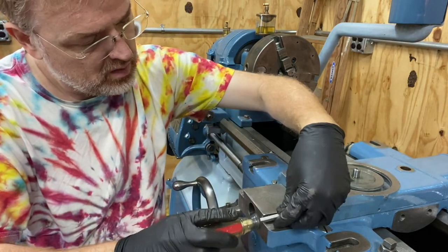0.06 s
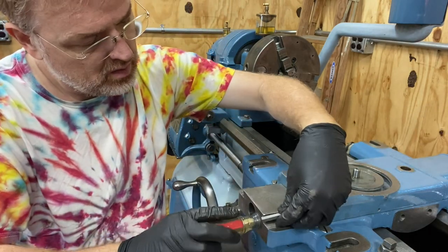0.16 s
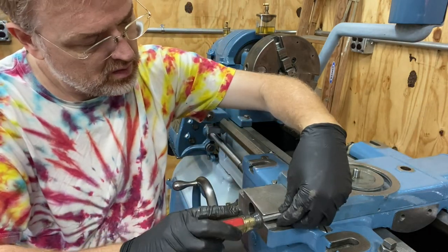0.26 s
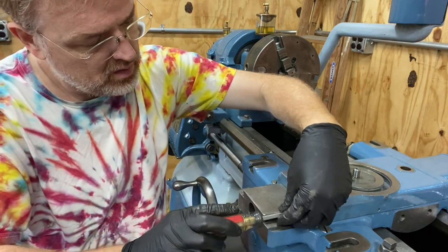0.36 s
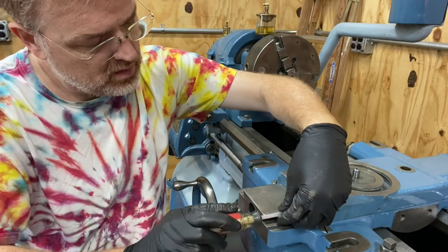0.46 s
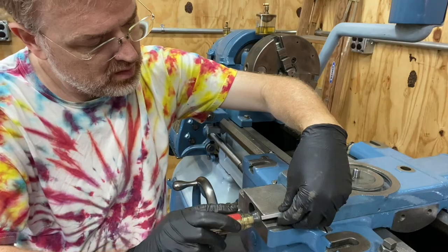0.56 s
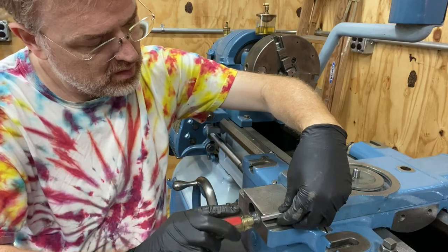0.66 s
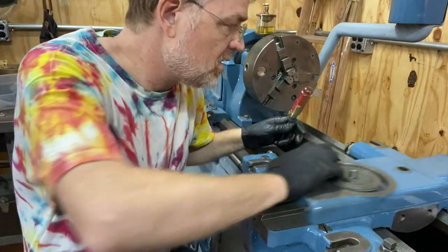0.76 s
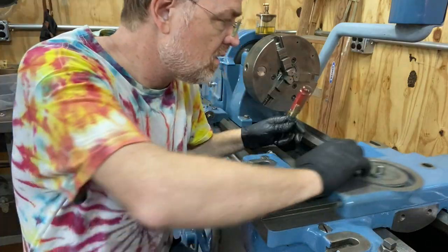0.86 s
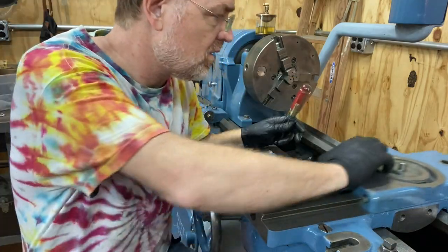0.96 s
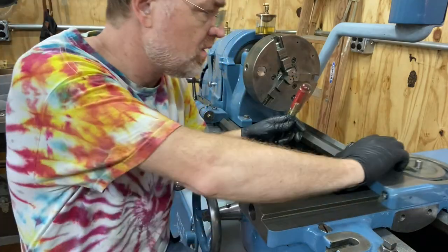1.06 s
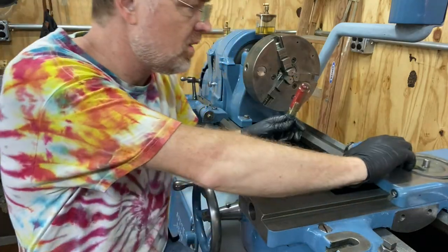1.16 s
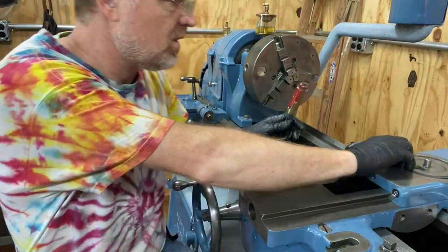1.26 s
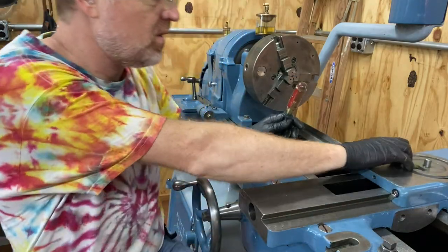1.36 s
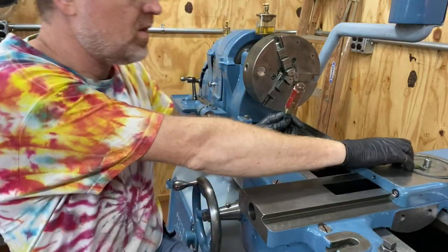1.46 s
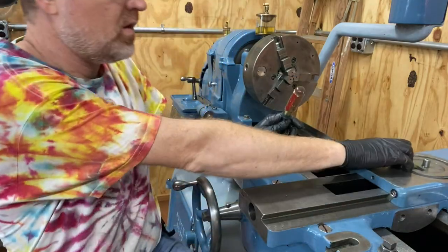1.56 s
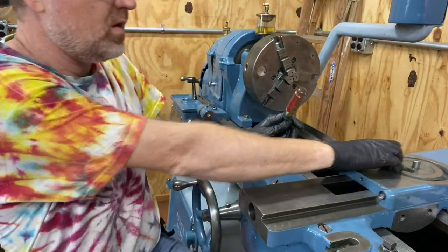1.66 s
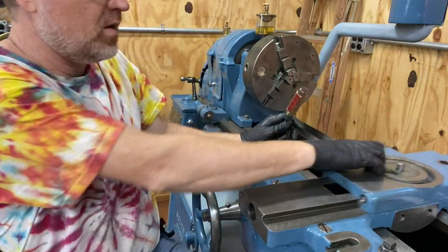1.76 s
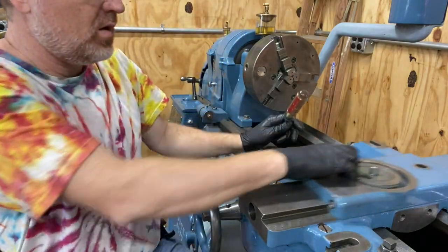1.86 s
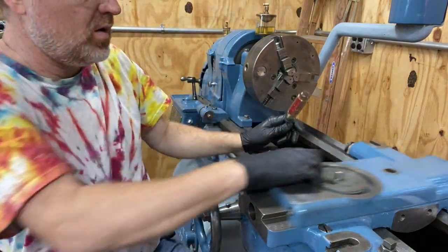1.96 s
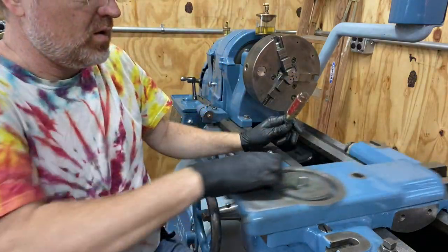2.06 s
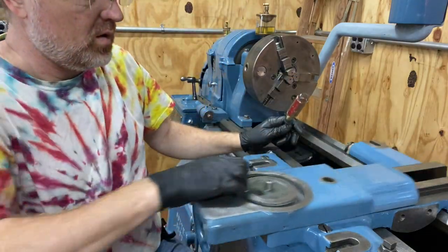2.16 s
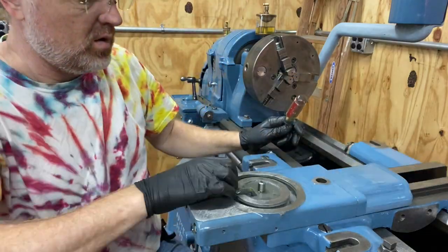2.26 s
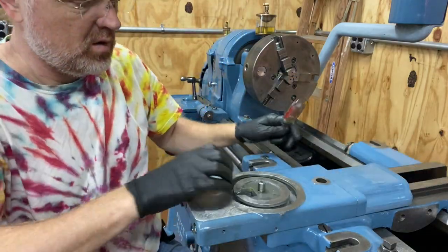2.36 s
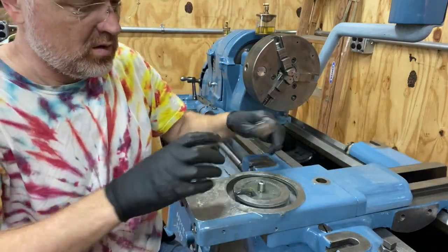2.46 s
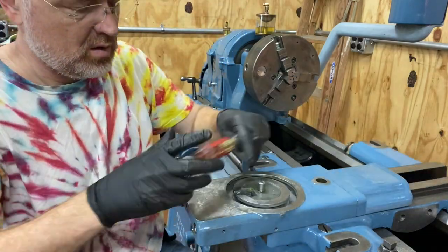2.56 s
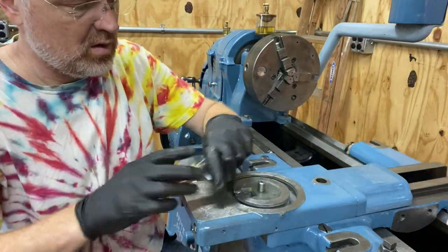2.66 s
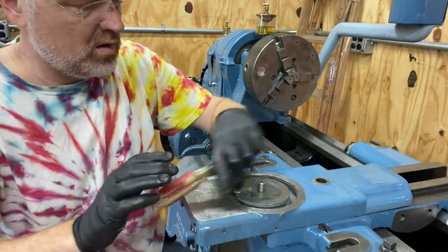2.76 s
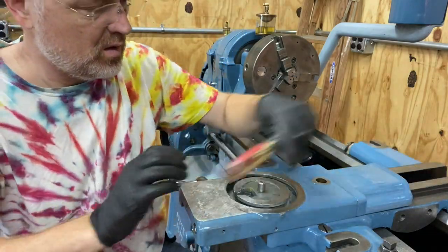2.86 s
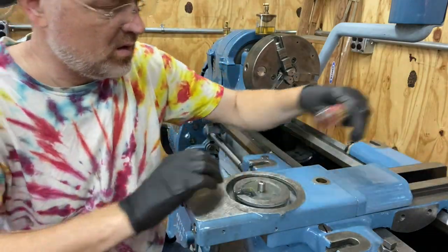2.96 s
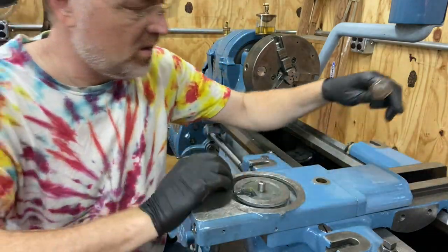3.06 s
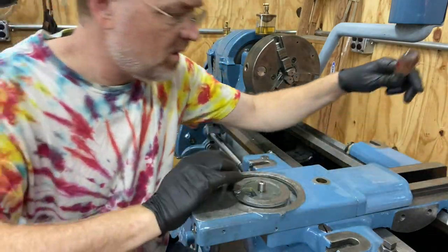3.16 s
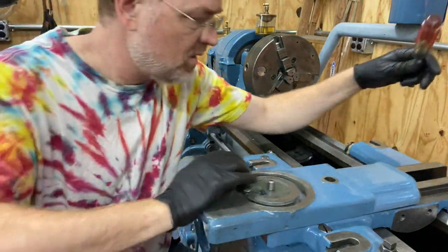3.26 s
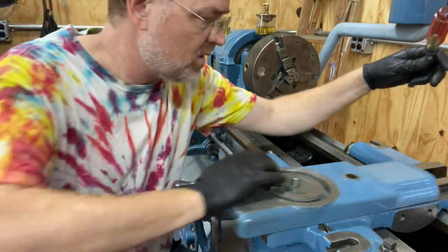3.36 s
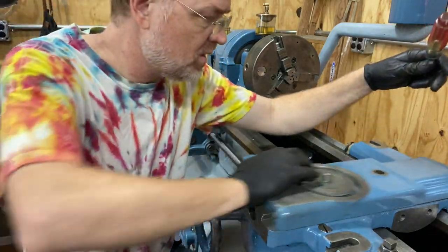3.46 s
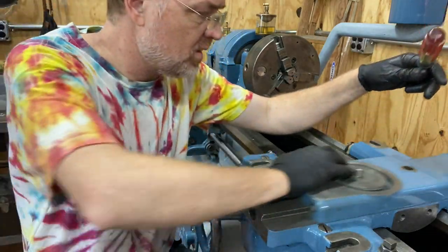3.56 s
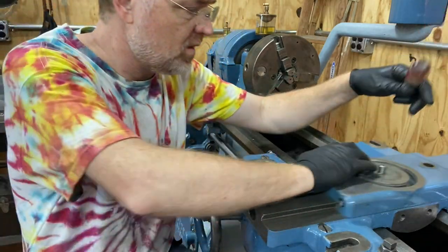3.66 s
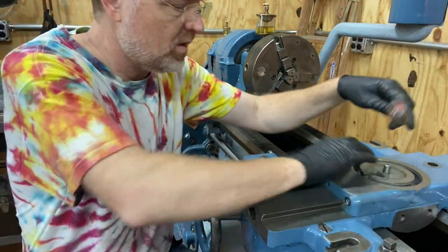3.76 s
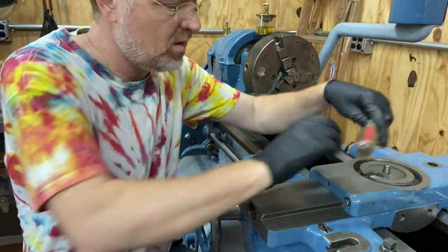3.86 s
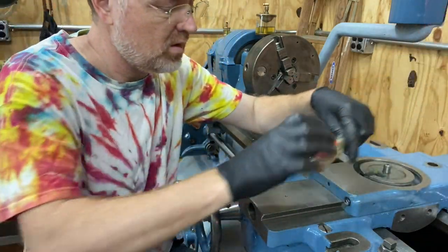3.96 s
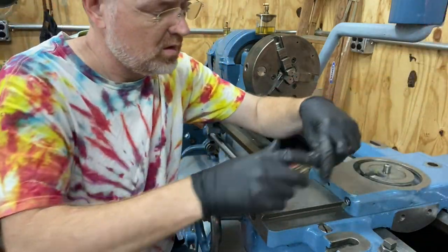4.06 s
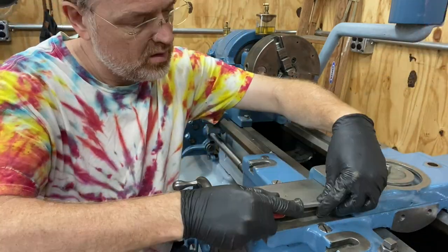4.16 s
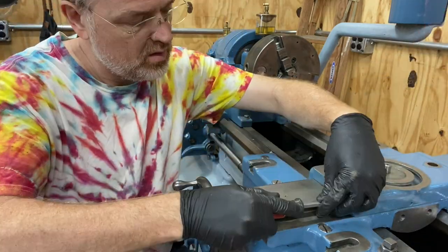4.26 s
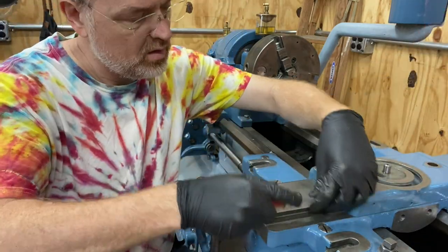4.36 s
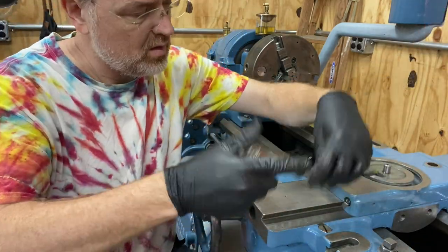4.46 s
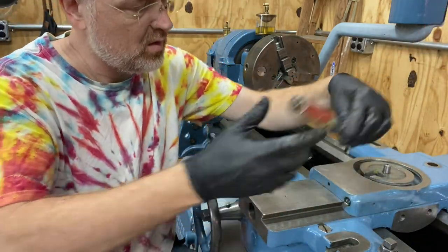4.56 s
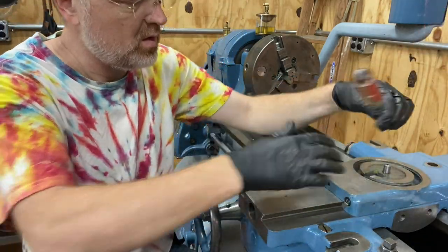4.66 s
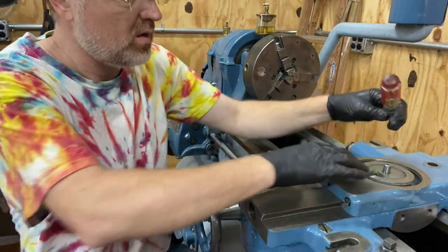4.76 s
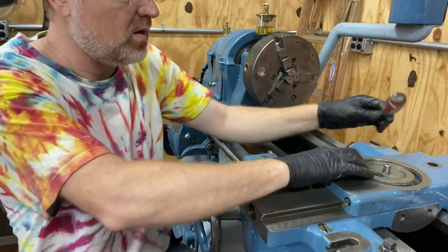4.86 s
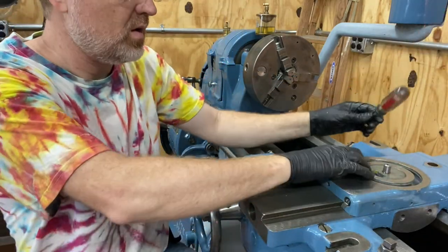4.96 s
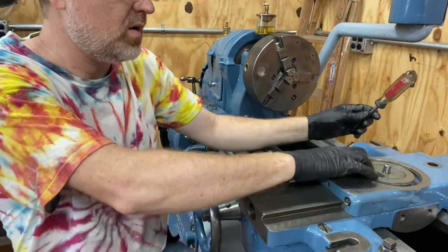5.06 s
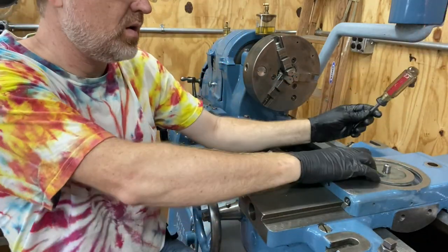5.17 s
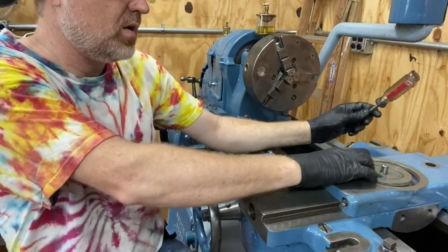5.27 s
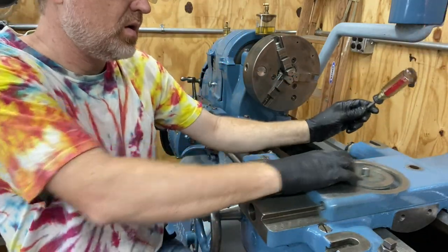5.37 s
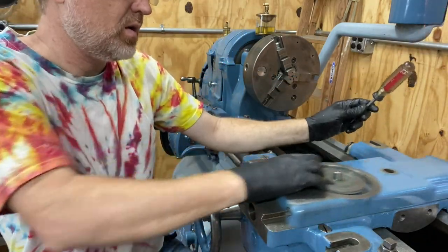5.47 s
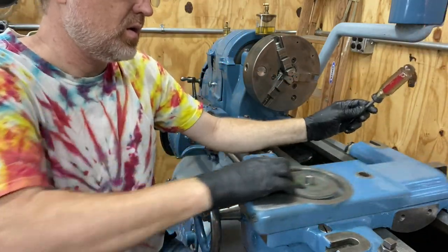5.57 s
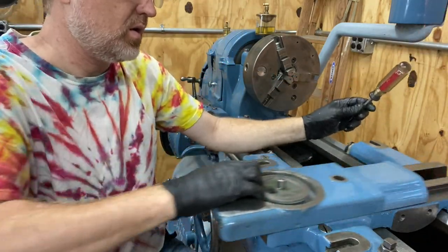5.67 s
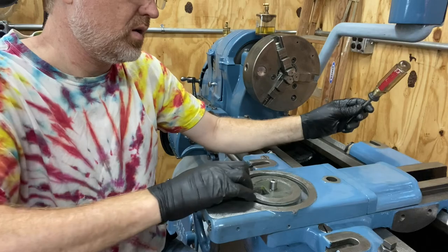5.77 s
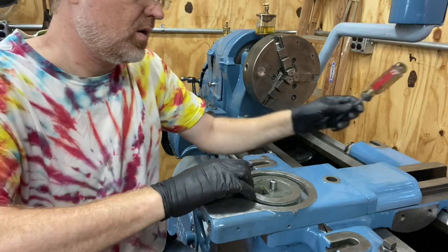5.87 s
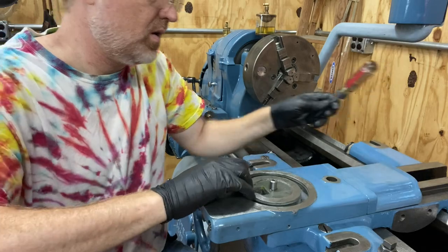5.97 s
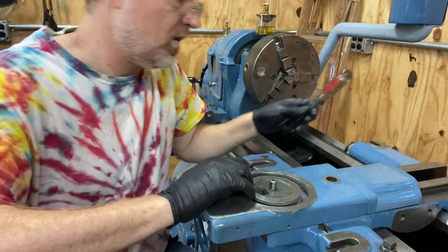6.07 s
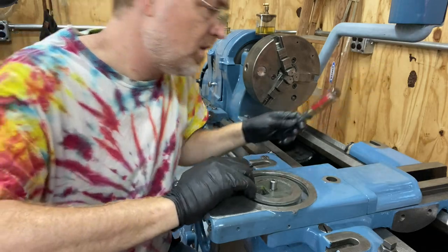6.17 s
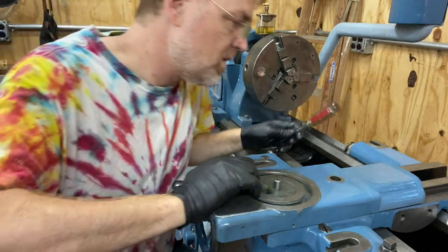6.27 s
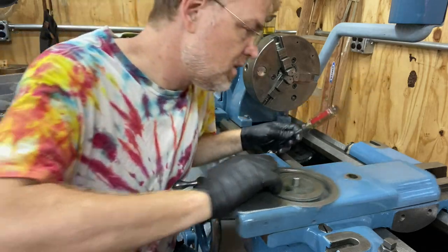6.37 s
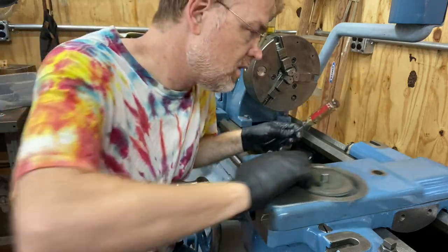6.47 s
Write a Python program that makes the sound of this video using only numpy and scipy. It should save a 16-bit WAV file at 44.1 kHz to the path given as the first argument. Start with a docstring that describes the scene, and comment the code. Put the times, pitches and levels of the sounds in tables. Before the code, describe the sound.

In a small wooden workshop, light screwdriver taps come first, then a heavy iron slide scrapes along its ways and stops with a sharp metallic clack. It grinds back, a hollow cover is knocked, and another scrape follows. Rattly knocks and ticks lead to the loudest, heavy clunk, then two more gritty strokes. Close stereo microphone, short room echo, faint machine murmur.

```python
"""Cast-iron slide in a workshop

A heavy cast-iron slide is pushed to and fro along its ways in a small wooden workshop: grit, hiss and rumble.
Between the strokes a screwdriver taps, short bright fizzes sound, a cover is knocked and the slide clunks home.
Each blow is a short contact that rings decaying modes and the shop; a faint murmur and whine lie below.
Left and right differ in likeness, phase and level from frequency to frequency."""
import sys
import numpy as np
from scipy import signal
from scipy.fft import rfft, irfft, next_fast_len
from scipy.io import wavfile
from scipy.ndimage import uniform_filter1d

SR = 44100
rng = np.random.default_rng(int(sys.argv[2]) if len(sys.argv) > 2 else 0)


def persist_wave(psi):
    """Save psi, clipped to +-1, as 16-bit WAV."""
    counts = np.round(np.clip(psi, -1, 1) * 32767).astype(np.int16)
    wavfile.write(sys.argv[1], SR, np.atleast_2d(counts).T)


N = 287973

# modes of the slide and bed: mode_hz, relative_level_db, t60_s
CASTING_MODES = [(53.3, -31.5, .6), (121.5, 3, 0.29), (198.3, -20.5, 0.48), (247.7, 7, 0.21),
                 (339.2, -0.5, 0.46), (425, 0.5, 0.25), (532, 3.5, 0.15), (683, 1, 0.14), (732, -18, 0.2),
                 (817, 7.5, 0.053), (896, 2.5, 0.064), (1001, 3, 0.12), (1236, -2, 0.13), (1240, -13, 0.17),
                 (1567, -6.5, 0.089), (1730, -5.5, 0.18), (1850, -18.5, 0.15), (2386, 5, 0.14),
                 (2660, 2, 0.23), (2890, 3, 0.076), (3670, -4.5, .15), (4800, -8, 0.12), (5480, -8, 0.14),
                 (5600, -4, 0.12), (8250, -9, .08)]


def gain_of(db):
    """Decibels to amplitude."""
    return 10 ** (np.asarray(db) / 20)


def evened(x):
    """Scales to rms 1."""
    return x / np.sqrt(np.mean(x ** 2) + 1e-30)


def read(points, hz):
    """Reads (Hz, value) points on a log-frequency axis."""
    f, value = np.transpose(points)
    return np.interp(np.log(hz + 1), np.log(f + 1), value)


def coloured(x, db_of_hz):
    """Filters x by a gain given in dB as a function of frequency."""
    size = next_fast_len(x.shape[-1])
    gain = gain_of(db_of_hz(np.fft.rfftfreq(size, 1 / SR)))
    return irfft(rfft(x, size) * gain, size)[..., :x.shape[-1]]


def smoothed(x, bins, frames):
    """Moving average of a noise field, as the grit's patches and streaks need."""
    return uniform_filter1d(uniform_filter1d(x, size=bins, axis=0), size=frames, axis=1)


def grit(per_s, spread_db, patchy_db, streaky_db):
    """Two channels of tiny uneven contacts; broad patches and thin streaks come and go in it."""
    size = gain_of(spread_db * np.minimum(rng.exponential(1, (2, N)), 5))
    clicks = size * rng.standard_normal((2, N)) * (rng.random((2, N)) < per_s / SR)
    z = signal.stft(clicks, nperseg=512, noverlap=384)[2]
    chance = rng.standard_normal((z.shape[2], z.shape[1], 2)).T
    patches = smoothed(chance[0], bins=7, frames=8)
    streaks = smoothed(chance[1], bins=2, frames=24)
    field_db = patchy_db * evened(patches) + streaky_db * evened(streaks)
    return signal.istft(z * gain_of(field_db), nperseg=512, noverlap=384)[1][:, :N]


def until_cut(s, t):
    """1 from the start s up to the next cut, fading over the last 2.1 ms to 0; t counts from s."""
    # fizzes and blows under way stop here: cut_s
    cuts = [.6, .7, 2.555, 4.115, 4.72]
    stop = min([c for c in cuts if c > s] + [s + t[-1]]) - s
    return np.clip((stop - t) / 0.0021, 0, 1)


def shop_tail():
    """Shop echo: sparse taps of random sign, each band dying at its own speed, other taps for each channel."""
    # decay of the shop: hz, t60_s
    shop_decay = [(60, 0.63), (260, 0.33), (700, 0.54), (1840, 0.65), (4850, 0.59), (10000, 0.53)]
    taps = np.zeros((2, SR))
    at = np.arange(200, SR - 20, 20) + rng.integers(0, 20, (2, (SR - 201) // 20))
    np.put_along_axis(taps, at, rng.choice([-1., 1.], at.shape), 1)
    hz, t, z = signal.stft(taps, SR, nperseg=256)
    decay_db = -60 * t / read(shop_decay, hz)[:, None]
    tail = signal.istft(z * gain_of(decay_db), SR, nperseg=256)[1]
    return tail / np.linalg.norm(tail[0])


def with_shop(dry, tail, shop_db):
    """Adds the shop echo to a dry sound."""
    return dry + gain_of(shop_db) * signal.fftconvolve(dry, tail, axes=1)[:, :dry.shape[1]]


def struck(force, db_of_hz):
    """Causal filter: the phase follows from the log gain, so nothing sounds before the blow."""
    hz = abs(np.fft.fftfreq(force.shape[-1], 1 / SR))
    log_gain = np.log(gain_of(np.maximum(db_of_hz(hz), -100)))
    return np.fft.ifft(np.fft.fft(force) * np.exp(np.conj(signal.hilbert(log_gain)))).real


def ringing(t, modes, bell):
    """Sum of decaying sines, each channel with its own phases; modes far from the blow's centre drop out."""
    place_db = rng.normal(0, 0.59, len(modes))  # each spot favours other modes
    phase = rng.random((2, len(modes)))
    f, mode_db, t60 = np.transpose(modes)
    near = bell(f) > -40
    dying = np.exp(np.outer((2j * np.pi * f - np.log(1000) / t60)[near], t))
    start = gain_of(mode_db + place_db + bell(f)) * np.exp(2j * np.pi * phase)
    return (start[:, near] @ dying).imag


def blow(tail, modes, s, knock_db, centre_hz, octaves, contact_s, ring_db, tick_db, shop_db, rattle, chatter_db):
    """A short contact, part springy swing and part rattle, rings the struck body and the shop."""
    t = np.arange(2 ** 15 if knock_db > -30 else 2 ** 14) / SR  # loud blows are heard longer
    u = t / max(contact_s, .0003)
    rattle = np.clip(rattle, 0, 1)
    swing = np.sin(2 * np.pi * (centre_hz * t + rng.random((2, 1))))
    loose = rattle * np.sqrt(SR / centre_hz / 4)  # noise spreads over the whole band
    force = (loose * rng.standard_normal((2, len(t))) + (1 - rattle) * swing) * u * np.exp(-2 * u)

    def bell(hz):
        return -6 * (np.log2((hz + 1) / centre_hz) / octaves) ** 2

    def knock_shape_db(hz):
        tick_power = gain_of(2 * tick_db) * (hz > centre_hz) / (1 + (hz / 8500) ** 8)
        return 10 * np.log10(gain_of(2 * bell(hz)) + tick_power + 1e-30)

    knock = struck(force, knock_shape_db)
    knock /= abs(knock).max(1, keepdims=True)
    ring = ringing(t, modes, bell)
    ring *= 1 - np.exp(-(1.84 * u) ** 2)  # the ring builds up while the contact lasts
    noise = rng.standard_normal((2, len(t)))
    chatter = evened(uniform_filter1d(uniform_filter1d(noise, size=300), size=300))
    ring *= gain_of(chatter_db * chatter)  # loose parts rattle against the ringing body
    dry = knock + gain_of(ring_db) * ring / abs(ring).max()
    return gain_of(knock_db) * with_shop(dry, tail, shop_db) * until_cut(s, t)


def blows(tail, modes, rows, columns, **shared):
    """Every blow of one kind at its moment; columns name what follows the first three in each row."""
    out = np.zeros((2, N + SR))
    for s, knock_db, centre_hz, *more in rows:
        sound = blow(tail, modes, s, knock_db, centre_hz, **shared, **dict(zip(columns, more)))
        at = round(s * SR)
        out[:, at:at + sound.shape[1]] += sound
    return out[:, :N]


def air():
    """The quiet shop: a low lumpy murmur of machinery far off, a thin hiss and a faint steady whine."""
    # murmur and hiss: hz, relative_level_db
    air_spectrum = [(20, -11), (60, 2), (120, -7.5), (250, -16.5), (600, -19.5), (1500, -26), (3000, -27),
                    (5000, -28), (7500, -35), (12000, -29.5), (16000, -38.5)]
    # whine: centre_hz, half_width_hz, unused
    whine = [(4960, 39, 0)]
    whine_hz, half_width_hz, _ = whine[0]
    level_db, whine_lift_db = -63, 11.5
    murmur = grit(per_s=10000, spread_db=3.0, patchy_db=-0.5, streaky_db=1.0)

    def shape_db(hz):
        return read(air_spectrum, hz) + whine_lift_db / (1 + ((hz - whine_hz) / half_width_hz) ** 2)

    return gain_of(level_db) * evened(coloured(murmur, shape_db))


def fizzes():
    """Short bright fizzes with some body, some swelling into a blow or trailing after one; rise, hold and fade."""
    # fizzes: start_s, rise_s, hold_s, fade_db_per_s, fizz_db, body_re_fizz_db
    fizz_events = [(0.0, 0.00099, 0.053, 105, -58, -19), (0.208, 0.026, .015, 598, -73, -9),
                   (0.614, .005, 0.0052, 220, -56.5, 1), (1.17, .02, 0.13, 47, -64.5, -24),
                   (2.256, 0.023, 0.01, 400, -59, 3), (2.557, 0.006, 0.062, 174, -51.5, -8.5),
                   (2.967, 0.012, 0.029, 300, -59, 3), (3.025, 0.0024, 0.0029, 150, -58.5, 20.5),
                   (3.77, 0.029, 0.11, 495, -69, -18), (4.017, 0.0093, .02, 70, -53.5, 2.5),
                   (4.257, 0.033, 0.02, 297, -68, -4), (4.311, 0.0095, 0.11, 157, -54.5, -3.5),
                   (4.505, 0.035, 0.11, 125, -74, -25), (4.726, 0.064, .008, 900, -48, -2),
                   (5.086, 0.031, .04, 150, -64.5, -13), (5.76, .04, 0.042, 90, -67, -14)]
    # bright part: hz, relative_level_db
    fizz_spectrum = [(1500, -56.5), (3000, -9.5), (5000, -5), (8300, -7.5), (11000, -3.5), (14000, -9),
                     (16000, -22)]
    # body: hz, relative_level_db
    body_spectrum = [(200, -2.5), (600, -9.5), (1200, 0.5), (2500, -3.5), (4000, -25.5)]
    grains = grit(per_s=7200, spread_db=-0.5, patchy_db=1.1, streaky_db=3.0)
    fizz = evened(coloured(grains, lambda hz: read(fizz_spectrum, hz)))
    body = evened(coloured(grains, lambda hz: read(body_spectrum, hz)))
    out = np.zeros((2, N))
    for s, rise_s, hold_s, fade_db_per_s, fizz_db, body_db in fizz_events:
        at = round(max(s, 0) * SR)
        t = np.arange(min(SR // 2, N - at)) / SR
        rise = np.minimum(t / max(rise_s, .001), 1) ** 2
        fade_db = fade_db_per_s * np.maximum(t - rise_s - hold_s, 0)
        envelope = rise * gain_of(fizz_db - fade_db) * until_cut(s, t)
        span = slice(at, at + len(t))
        out[:, span] += envelope * (fizz[:, span] + gain_of(body_db) * body[:, span])
    return out


def taps(tail):
    """Screwdriver taps: short rattly contacts ring the tool's own modes."""
    # taps: start_s, knock_db, centre_hz, ring_db, tick_db
    tap_events = [(.262, -37.5, 1230, -5, -17), (0.393, -48, 1600, -9, -27), (.4405, -41, 990, 1.5, -34),
                  (0.606, -32.5, 1200, -5, -5)]
    # modes of the screwdriver: mode_hz, relative_level_db, t60_s
    tool_modes = [(560, -6, .07), (759, 3, 0.11), (995, 0.5, 0.09), (1180, -1.5, .08), (1356, -1.5, 0.1),
                  (1760, -1.5, 0.068), (2100, -4, .07), (2490, -4, 0.09), (4950, -3, .06)]
    return blows(tail, tool_modes, tap_events, ["ring_db", "tick_db"],
                 octaves=0.9, contact_s=0.005, shop_db=-6, rattle=0.82, chatter_db=3)


def humps_db(hz, height_db, width_hz):
    """Rubbing lifts the spectrum around the modes of the casting."""
    return sum((height_db + 0.31 * db) / (1 + ((hz - f) / width_hz) ** 2) for f, db, t60 in CASTING_MODES)


def slide(tail):
    """Iron on oily iron: dense grit that the casting colours, with a coarse low grind, fine hiss and bed rumble."""
    # one curve a stroke: time_s, scrape_db, grind_re_scrape_db
    strokes = [
        [(0.7, -60, -9), (0.71, -45.5, -10.5), (0.8, -48.5, -15), (0.95, -47, -12.5), (1.137, -51, -9),
         (1.184, -59, -9), (1.292, -66, -9), (1.42, -77, -9)],
        [(1.5, -71, -12), (1.545, -53, -11), (1.73, -47, -15), (1.9, -48, -7.5), (1.99, -41.5, -12),
         (2.06, -37.5, -8.5), (2.12, -41, -3.5), (2.18, -49, 2.5), (2.242, -67, 3), (2.3, -75, -5)],
        [(3.1, -70, -9), (3.17, -52.5, -8), (3.3, -42.5, -6), (3.44, -42, -5.5), (3.64, -49.5, -15),
         (3.72, -54.5, -1), (3.8, -70, -1)],
        [(5.12, -75, -12), (5.2, -66, -12), (5.26, -52, -18), (5.36, -47, -16), (5.474, -44.5, -16),
         (5.58, -40.5, -8), (5.69, -47, -5), (5.75, -56, -3), (5.82, -60, -2)],
        [(6.16, -81, -6), (6.205, -56.5, -7), (6.27, -48.5, -4), (6.43, -41.5, -5), (6.53, -50, -7)],
    ]
    # spectra, each: hz, relative_level_db
    scrape_spectrum = [(150, -110), (400, -10), (800, -2), (1300, 5.5), (2400, -1), (4000, -9),
                       (6000, -14.5), (9000, -35)]
    hiss_spectrum = [(2500, 0), (4500, 2.5), (6500, 0), (8300, 1.5), (11000, 2), (14500, -5.5),
                     (16000, -15)]
    rumble_spectrum = [(25, -30), (55, 16), (120, 2.5), (250, 1), (450, -13), (800, -35)]
    grind_spectrum = [(120, -39), (300, -6.5), (500, 0.5), (850, -2), (1300, -11), (2500, -44)]
    hiss_top_db, hiss_knee_db, hiss_bend_db = -50.5, -47.5, 0.5
    rumble_db_at_ref, rumble_db_per_db, scrape_ref_db = -66, 0.49, -49.5

    contact = grit(per_s=9000, spread_db=0.0, patchy_db=2.0, streaky_db=2.5)
    scrape = coloured(contact, lambda hz: read(scrape_spectrum, hz) + humps_db(hz, height_db=6, width_hz=9.2))
    hiss = coloured(contact, lambda hz: read(hiss_spectrum, hz))
    rumble = coloured(contact, lambda hz: read(rumble_spectrum, hz) + humps_db(hz, height_db=14.5, width_hz=5.6))
    coarse = grit(per_s=2500, spread_db=2.5, patchy_db=3.5, streaky_db=2.5)
    grind = coloured(coarse, lambda hz: read(grind_spectrum, hz) + humps_db(hz, height_db=4.5, width_hz=11))

    t = np.arange(N) / SR
    in_stroke = sum((t >= rows[0][0]) * (t <= rows[-1][0]) * 1. for rows in strokes)
    moving = uniform_filter1d(in_stroke, size=200)
    at, *columns = np.transpose(sum(strokes, []))
    scrape_db, grind_db = (np.interp(t, at, c) for c in columns)
    # the hiss grows with the scrape up to the knee, then levels off
    hiss_db = hiss_top_db - hiss_bend_db * np.logaddexp(0, (hiss_knee_db - scrape_db) / hiss_bend_db)
    rumble_db = rumble_db_at_ref + rumble_db_per_db * (scrape_db - scrape_ref_db)
    dry = gain_of(scrape_db) * (evened(scrape) + gain_of(grind_db) * evened(grind))
    dry += gain_of(hiss_db) * evened(hiss)
    dry += gain_of(rumble_db) * evened(rumble)
    return with_shop(moving * dry, tail, shop_db=-6.5)


def clunks(tail):
    """Hard blows of the slide: the contact rings the casting."""
    # clunks: start_s, knock_db, centre_hz, contact_s, shop_db, ring_db, rattle_0_to_1
    clunk_events = [(0.703, -40, 1410, 0.008, -5, -8, .9), (1.145, -16, 2390, 0.00078, -8.5, -22, 0.19),
                    (1.1452, -23.5, 860, 0.0011, -10, -20, 0.2), (1.152, -22, 2500, 0.0015, -8, -22, .5),
                    (1.1525, -33, 800, .003, -8, -20, .4), (4.721, -38, 795, 0.008, 2, -10, 0.8),
                    (4.792, -27.5, 1670, 0.0052, 2.5, -12.5, .9),
                    (4.797, -9.5, 1022, 0.0088, -1, -10, 0.72)]
    return blows(tail, CASTING_MODES, clunk_events, ["contact_s", "shop_db", "ring_db", "rattle"],
                 octaves=1.146, tick_db=-26.5, chatter_db=6)


def jolts(tail):
    """Soft low jolts through the bed: longer contacts with low centres ring the casting."""
    # jolts: start_s, knock_db, centre_hz, ring_db, contact_s
    jolt_events = [(0.71, -49, 61.4, -10, .02), (1.181, -36.5, 401, -24, .012),
                   (1.206, -44.5, 142, -14, 0.014), (1.246, -49, 96, -9, 0.022),
                   (2.14, -43, 260, -13, 0.016), (2.204, -33, 393, -12, 0.01), (2.226, -37, 125, -18, .007),
                   (2.255, -46, 151, -14, .015), (2.285, -41.5, 110, -19, 0.023),
                   (2.79, -35, 85.6, -8, 0.023), (3.03, -36, 299, -12, .015), (3.055, -42, 70, -14, .025),
                   (3.34, -37, 380, -8, 0.021), (3.708, -37.5, 460, -8, 0.014),
                   (3.76, -42, 155.5, -16, 0.026), (3.937, -36, 315, -8, .015),
                   (3.954, -32, 400, -10.5, 0.014), (3.97, -38, 195, -10, .025),
                   (4.724, -38, 371, -4, 0.017), (4.73, -44, 140, -10, .025), (4.76, -44, 55, -12, .03),
                   (4.803, -20.5, 130, -20, .012), (4.804, -28, 560, -10, .015),
                   (4.808, -23, 330, -7, 0.014), (4.82, -29.5, 190, -12, .02), (4.835, -32, 62, -18, .02),
                   (4.845, -28, 239, -9, .02), (4.87, -32, 80, -18, .015), (4.91, -35, 120, -11.5, 0.03),
                   (4.94, -36, 330, -13.5, 0.014), (4.958, -28, 245, -22, .03), (4.962, -34, 135, -14, .02),
                   (5.036, -39, 100, -16, .015), (5.344, -54, 93, -17, .02), (5.568, -34, 340, -13, .018),
                   (5.618, -41, 238, -4, 0.021), (5.655, -42, 95, -14, .025), (5.708, -37, 438, -10, 0.014),
                   (5.732, -39, 130, -14, .012), (5.765, -42, 450, -12, .012), (5.785, -40, 110, -12, .025),
                   (5.84, -46, 70.3, -10, .02), (6.152, -51, 179.5, -6, 0.018),
                   (6.283, -38.5, 133, -12, .02)]
    return blows(tail, CASTING_MODES, jolt_events, ["ring_db", "contact_s"],
                 octaves=0.9, tick_db=-44, shop_db=-5, rattle=.5, chatter_db=4)


def ticks(tail):
    """Small ticks: brief rattly contacts ring the casting and the shop."""
    # ticks: start_s, knock_db, centre_hz
    tick_events = [(2.4287, -53.5, 2400), (2.4758, -55, 3320), (2.4864, -54, 2540), (2.568, -43, 3800),
                   (2.586, -42, 3260), (2.643, -40, 1610), (4.32, -41.5, 2530), (4.34, -37.5, 3850),
                   (4.347, -40, 3850), (4.355, -38, 3850), (4.364, -32.5, 3380), (4.438, -43, 1730),
                   (4.7514, -54, 1330), (5.881, -57, 2590), (6.0183, -62, 2990)]
    return blows(tail, CASTING_MODES, tick_events, [], octaves=0.86, contact_s=0.0025,
                 ring_db=-9, tick_db=-30.5, shop_db=-3, rattle=0.78, chatter_db=7)


def knocks(tail):
    """Knocks on the hollow cover: the contact rings the cover's own modes."""
    # knocks: start_s, knock_db, centre_hz, spread_octaves, ring_db, tick_db, contact_s, rattle_0_to_1
    knock_events = [(2.765, -17.5, 700, .9, -1.5, -34, .013, .15),
                    (2.766, -31, 1240, .9, 1.5, -26, .01, .5), (2.768, -22, 206, .7, -11, -47, .016, 0.3),
                    (2.785, -28, 390, 0.53, -5, -48, 0.017, 0.3),
                    (3.0231, -22, 1780, 0.83, -2, -12, 0.0082, 0.95),
                    (3.936, -31, 1390, .75, 0, -34, 0.0089, 0.95),
                    (3.948, -25.5, 1800, 0.72, 3, -26.5, 0.0075, 0.8)]
    # modes of the hollow cover: mode_hz, relative_level_db, t60_s
    cover_modes = [(90.3, 9.5, 0.23), (140, 0, 0.2), (198.5, 3, 0.23), (251, -9, 0.12), (334, 2.5, 0.38),
                   (426, -2.5, 0.2), (676, 7, 0.087), (738, -2, 0.17), (817, -2.5, 0.21), (912, 1, 0.17),
                   (1246, -1.5, 0.067), (1520, -15, 0.13), (1737, -6.5, 0.18), (2340, -5, 0.13),
                   (2617, -7.5, 0.2), (2820, -7.5, 0.16), (3830, -11, 0.2), (5370, 4, 0.16),
                   (5840, 3, 0.22), (8200, 2, 0.09)]
    return blows(tail, cover_modes, knock_events, ["octaves", "ring_db", "tick_db", "contact_s", "rattle"],
                 shop_db=-3, chatter_db=2.5)


def scene():
    """All sources in two channels."""
    tail = shop_tail()
    out = air() + fizzes() + taps(tail) + slide(tail)
    return out + clunks(tail) + jolts(tail) + ticks(tail) + knocks(tail)


def record(dry):
    """Left and right channels: likeness, phase lead and level balance set per frequency; then the band limit."""
    # channels: hz, likeness_0_to_1, right_lead_rad, left_minus_right_db
    channel_curves = [(50, .94, 0, -.3), (200, .9, .4, -.2), (500, .45, 1.1, -2.5), (1500, .3, 2.5, -1.2),
                      (3900, .35, 6.3, -1.2), (5200, .4, 9.4, -2), (6500, .5, 7.5, -1.5),
                      (7500, 1, 6.283, 0), (8200, 1, 6.283, 0), (9100, .6, 5.1, 0), (10000, 1, 3.1416, 0),
                      (11100, 1, 3.1416, 0), (11800, .5, 2.1, 0), (12500, 1, 0, 0), (13700, 1, 0, 0),
                      (14250, .4, -1.4, 0), (14900, 1, -3.1416, 0)]
    edge_hz = 15750
    size = next_fast_len(N + 4096)
    hz = np.fft.rfftfreq(size, 1 / SR)
    left, other = rfft(dry, size)
    f, *columns = np.transpose(channel_curves)
    same, lead_rad, balance_db = (np.interp(hz, f, c) for c in columns)
    right = same * np.exp(1j * lead_rad) * left + np.sqrt(1 - same ** 2) * other
    balanced = np.array([left * gain_of(balance_db / 2), right * gain_of(-balance_db / 2)])
    pair = irfft(balanced, size)[:, :N]
    lowpass = signal.firwin(511, edge_hz, window=("kaiser", 9), fs=SR)
    return signal.oaconvolve(pair, lowpass[None], "same")


dry = scene()
out = record(dry)
persist_wave(out)
```